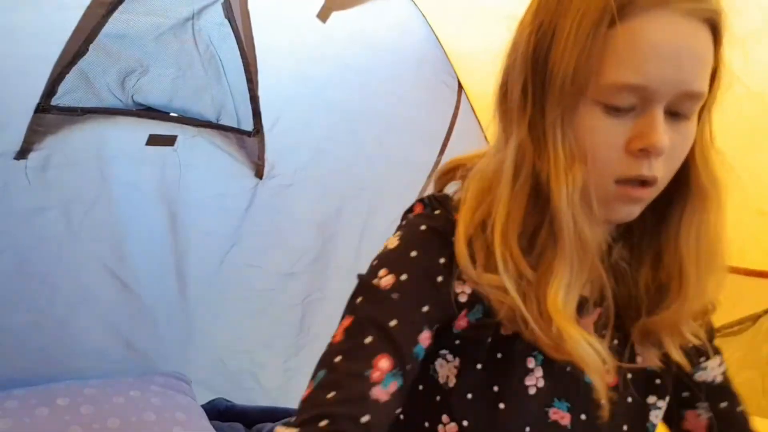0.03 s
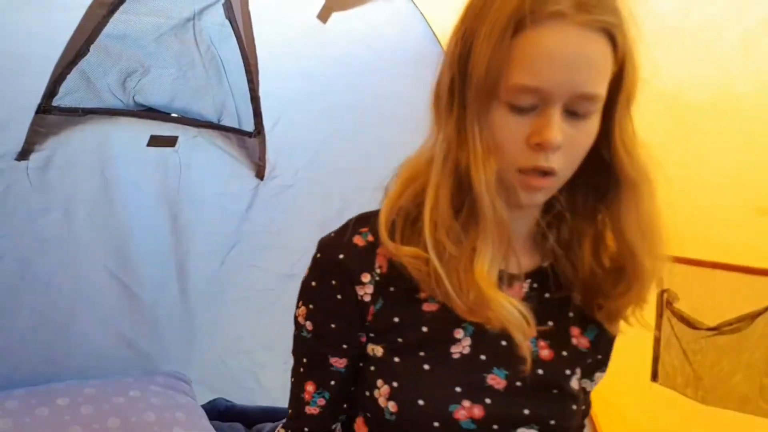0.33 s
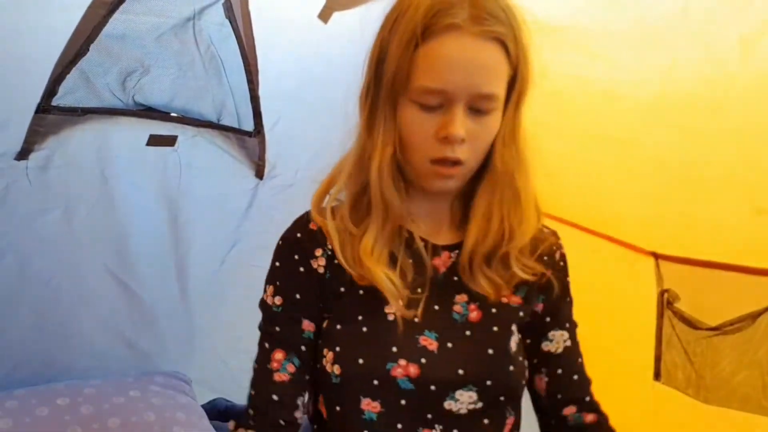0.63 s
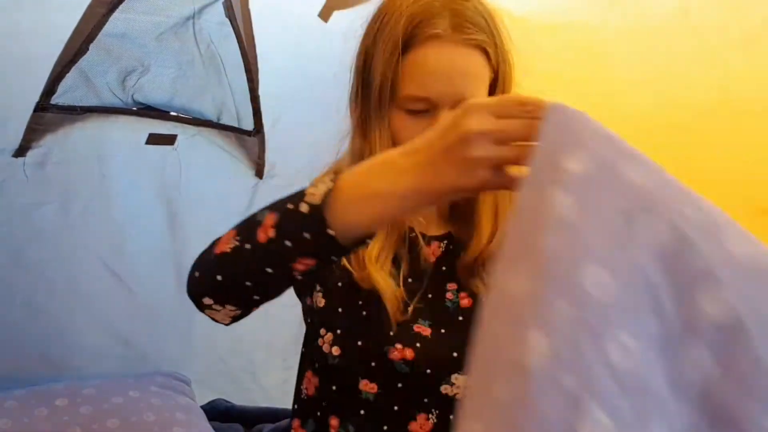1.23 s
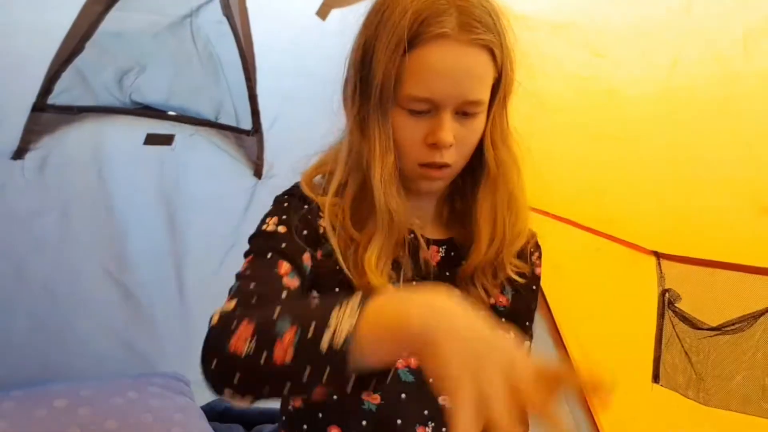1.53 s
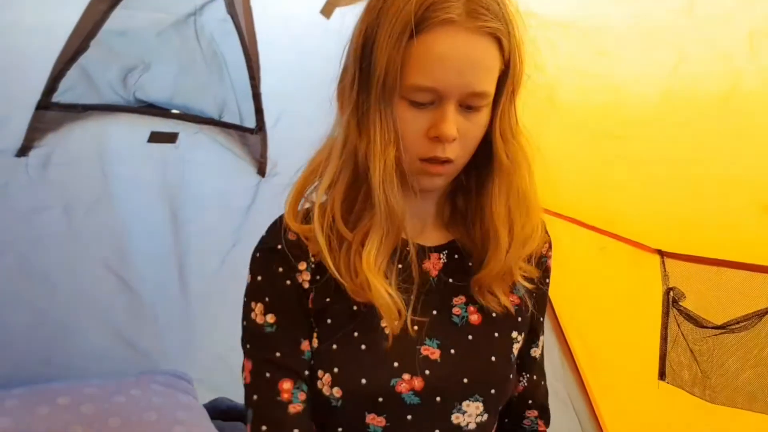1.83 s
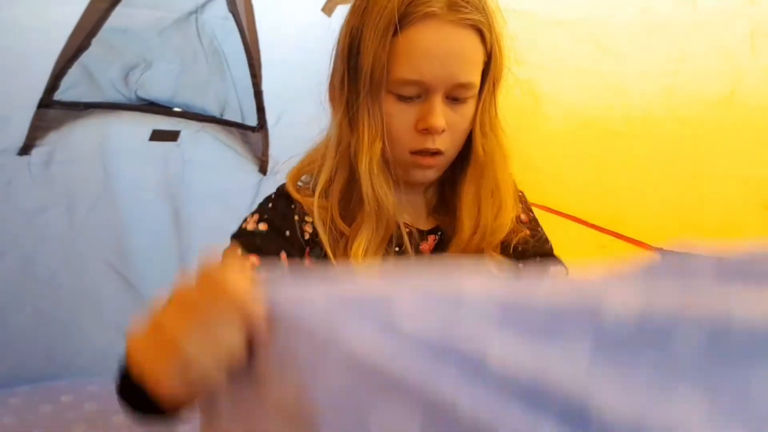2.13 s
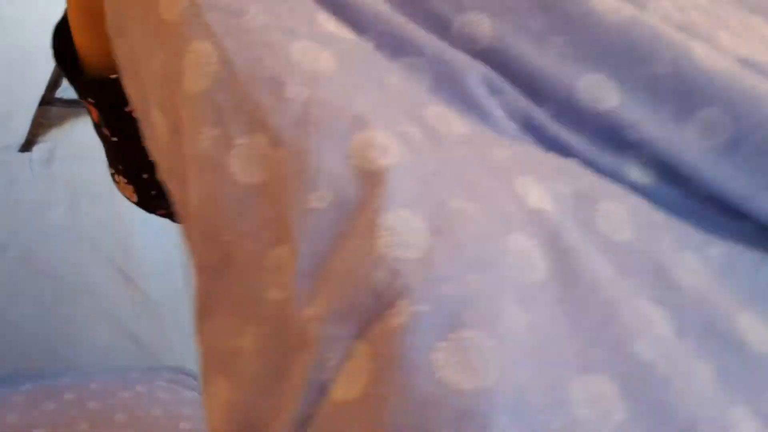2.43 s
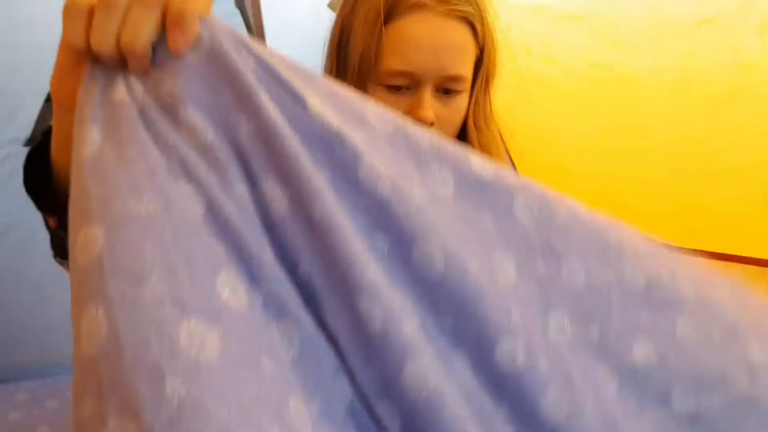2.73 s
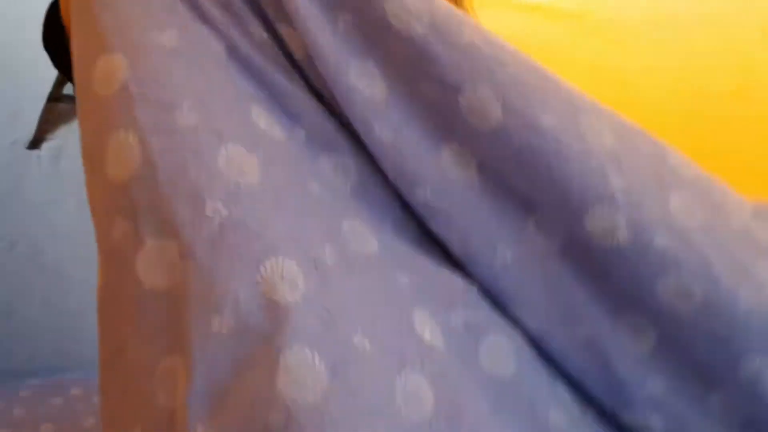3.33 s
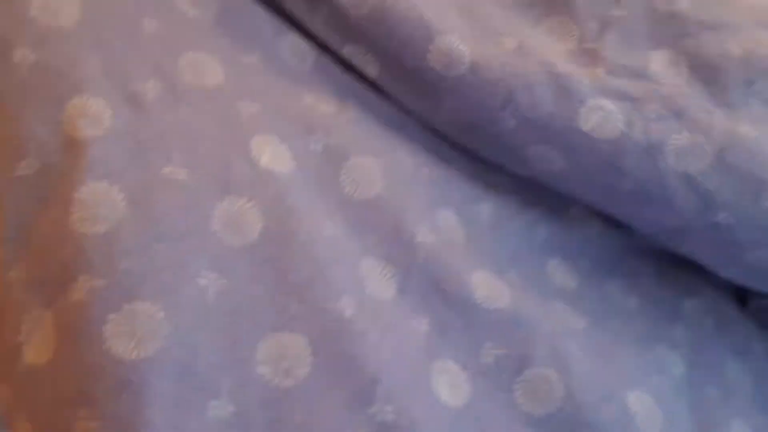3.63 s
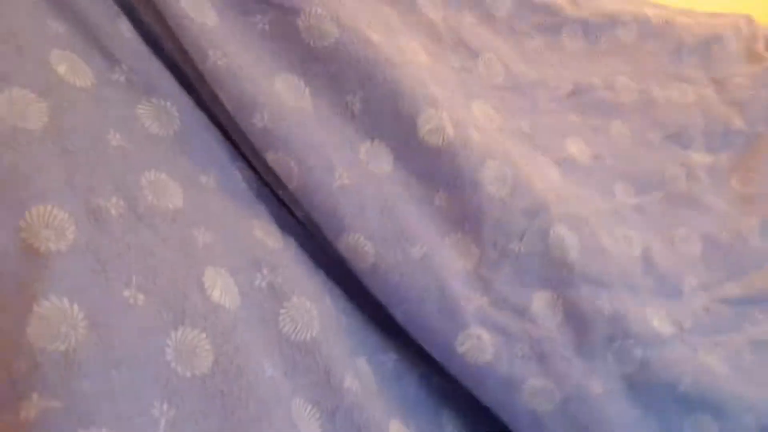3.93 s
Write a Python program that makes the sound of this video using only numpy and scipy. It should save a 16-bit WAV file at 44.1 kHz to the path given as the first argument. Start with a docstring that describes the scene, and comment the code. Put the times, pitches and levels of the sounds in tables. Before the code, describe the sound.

A cloth sheet swishes and flaps softly close by, over a low outside rumble.

```python
"""Shaking out a sheet in a tent

Inside a tent, close to the microphone, a cloth sheet is lifted, shaken and spread out twice.
The weave hisses as it slides and swishes when pulled; folds flap softly, small creases tick,
and the billowing cloth pushes puffs of air at the microphone.
A steady low rumble comes in from outside, and twice a faint thin whistle sounds."""
import sys
import numpy as np
from scipy import signal
from scipy.io import wavfile

SR = 44100
rng = np.random.default_rng(int(sys.argv[2]) if len(sys.argv) > 2 else 0)


def to_wav(s):
    """Save 16-bit WAV."""
    ch = np.atleast_2d(s).T  # columns
    pcm = np.round(np.clip(ch, -1, 1) * 32767)  # PCM
    wavfile.write(sys.argv[1], SR, pcm.astype(np.int16))


N = 176400
TIME = np.arange(N) / SR

# the rumble outside swells a little: (time [s], level [dB])
RUMBLE_LEVEL = [(0,-32.5),(.6,-37),(1.3,-35),(2,-35),(2.7,-33.5),(3.3,-35.5),(4,-34.5)]
# narrow drones in the rumble: (frequency [Hz], level [dB])
DRONES = [(71,-41),(99,-42.5),(137,-45.5),(202,-49.5),(350,-54.5)]
# faint whistles: (start [s], length [s], pitch [Hz], level [dB], scoop [share of the pitch])
WHISTLES = [(0.745,0.17,2305,-58.5,0.012),(2.41,0.385,1240,-49.3,.09)]
# air pushed at the microphone: (time [s], peak [dB], pitch [Hz], pan left [dB])
AIR_PUFFS = [(0.098,-20,93,-2),(0.83,-28,69.5,-5),(0.857,-24.5,70,-1),(0.884,-23.5,71.4,0),(1.835,-21.5,74.4,0),(2.225,-24,76,-1),(2.556,-16.5,68,-4),(2.616,-18.5,65.4,-8),(3.102,-24,76,-1.5)]
# creases that slip: (time [s], level [dB], decay [s])
CREASE_TICKS = [(.2195,-42,.001),(0.2385,-42,.0015),(0.649,-47,0.0018),(1.4298,-39,.0008),(1.464,-36.5,0.0011),(1.475,-37,0.0011),(1.5640,-36.5,0.0017),(1.567,-47,.001),(1.575,-39,.001),(1.578,-47,.002),(2.559,-46,0.011),(2.711,-42.5,.002),(2.82,-38,.001),(2.8312,-37.5,.0015),(2.849,-40,.001),(2.8595,-43,.001),(2.931,-38,.0007),(2.9558,-40.5,0.0015),(3.073,-43,0.0023),(3.076,-42,0.001),(3.099,-45,.002),(3.122,-46,0.0011)]
# folds that flap and go taut: (time [s], level [dB], half-length [s], pan left [dB], edge over body [dB])
FOLD_FLUTTERS = [(0.12,-35.5,0.098,2,-7.5),(0.167,-36.5,0.0088,1,-6),(0.778,-35,0.033,0.5,-14),(0.822,-32.5,0.027,3,-12),(0.951,-37,0.01,-5,-4),(2.084,-41,0.0078,6,-4),(2.115,-28.5,0.018,6.5,-16.5),(2.227,-34,0.03,3.5,-19),(2.303,-33,0.01,1,-6.5),(2.43,-31.5,0.046,0.5,-11),(2.545,-31,0.027,0,-28),(2.655,-39,0.12,7,-15),(2.87,-33,0.064,0.5,-22),(3.484,-35,0.03,1,-12)]
# soft slaps of the hem: (time [s], level [dB], half-length [s])
HEM_SLAPS = [(0.1739,-25,0.00048),(0.143,-30,.0014),(.782,-27,0.0011),(0.807,-29,0.00091),(0.817,-24,0.00062),(.954,-20.5,0.0011),(2.0792,-19.5,0.00044),(2.0925,-32,0.00088),(2.112,-11.5,0.00076),(2.1228,-27,.0013)]
# cloth sliding lightly on cloth: (time [s], level [dB])
SLIDE_LEVEL = [(0,-50.5),(.2,-55),(.3,-51),(.44,-49),(.61,-53),(.75,-50),(.98,-49.5),(1.07,-54),(1.14,-56.5),(1.21,-49),(1.29,-49.5),(1.41,-49.5),(1.58,-49.5),(1.61,-55),(1.65,-48),(1.75,-54),(1.88,-53.5),(2.02,-50.5),(2.25,-46),(2.36,-48.5),(2.5,-50),(2.76,-53.5),(2.84,-45.5),(3.0,-52.5),(3.1,-50),(3.2,-55),(3.31,-56),(3.41,-49),(3.68,-49),(3.8,-53),(3.92,-48),(4,-52.5)]
# cloth dragged under tension, a fuller rub: (time [s], level [dB])
DRAG_LEVEL = [(0,-47),(.08,-52.5),(.14,-41.5),(.23,-46),(.31,-54.5),(.69,-58),(.75,-49.5),(.98,-47),(1.06,-55.5),(1.33,-61),(1.85,-56.5),(2.05,-59),(2.2,-47),(2.53,-51.5),(2.77,-59.5),(2.89,-48),(3.01,-57.5),(3.31,-61),(3.48,-50),(4,-51.5)]
# quick pulls of the sheet: (peak time [s], level [dB], rise [s], fall [s])
SWISHES = [(0.133,-37.5,0.048,0.057),(.238,-48.5,0.024,.018),(.951,-49,0.019,0.019),(2.41,-39.5,0.017,0.11)]
# the hem brushing over cloth, thin and bright: (peak time [s], level [dB], rise [s], fall [s])
HEM_BRUSHES = [(.15,-43.5,0.038,0.028),(.953,-45.5,0.016,0.036),(1.22,-54.5,0.027,.03),(1.28,-49,0.022,0.026),(1.345,-48,0.022,0.032),(2.41,-43,0.026,.03)]

# spectrum of each noise at the microphone: (frequency [Hz], relative density [dB])
RUMBLE_COLOUR = [(38,-1),(55,0),(72,-5.5),(110,-7.5),(145,-9),(180,-12.5),(260,-16.5),(420,-20.5),(650,-22.5),(950,-24.5),(1400,-31.5),(2100,-42),(3200,-55),(15000,-72)]
TICK_COLOUR = [(1500,-6),(4000,-17),(8000,-1),(12000,-4.5),(15500,-32.5)]
FOLD_BODY_COLOUR = [(50,0.5),(120,4),(230,1),(400,-7),(700,-18.5),(1300,-32.5),(2500,-36)]
FOLD_EDGE_COLOUR = [(250,-3),(450,5),(750,-3.5),(1200,-9),(2200,-19)]
SLIDE_COLOUR = [(1500,-28),(3000,-10),(4500,-3.5),(6200,-3.5),(8000,-2.5),(10000,-1.5),(11800,-0.5),(14000,-5),(15500,-1)]
DRAG_COLOUR = [(200,6),(600,9),(1400,5),(2300,3),(3200,2.5),(4600,0.5),(7000,-2.5),(14000,-7)]
SWISH_COLOUR = [(300,13),(900,6.4),(1500,14),(2200,7.4),(4000,5.3),(6000,4.3),(8000,8.1),(12000,1.8),(15500,8.2)]
BRUSH_COLOUR = [(6000,-8),(9000,-11),(12000,-4.5),(15000,-6)]
# likeness of the left and right channels: (frequency [Hz], correlation [-1 to 1])
RUMBLE_LIKENESS = [(50,0.98),(130,0.94),(260,0.72),(500,0.75),(900,0.013),(1500,-0.16),(3000,-0.072),(12000,-0.88)]
CLOTH_LIKENESS = [(200,0.83),(500,0.87),(1100,-0.35),(2500,0.014),(5000,-0.057),(9000,0.016),(13000,0.17)]


def from_db(db):
    """Decibels to gain."""
    return 10 ** (np.asarray(db) / 20)


def rms_one(x):
    """Scale to unit rms."""
    return x / np.sqrt(np.mean(x ** 2) + 1e-20)


def gain_curve(levels):
    """A level curve as a gain at every sample."""
    return from_db(np.interp(TIME, *np.transpose(levels)))


def at_hz(points, hz):
    """Read a curve on a log-frequency axis."""
    frequencies, values = np.transpose(points)
    return np.interp(np.log(hz), np.log(frequencies), values)


def pan(db):
    """Left and right gains, the left louder by db."""
    return from_db(np.array([[db], [-db]]) / 2)


def drift(rate_hz):
    """A smooth random wander, rms 1."""
    step, settle = 40, 2000
    pole = np.exp(-2 * np.pi * rate_hz * step / SR)
    white = rng.standard_normal(N // step + settle + 2)
    slow = signal.lfilter([1], [1, -2 * pole, pole * pole], white)[settle:]
    return np.interp(np.arange(N) / step, np.arange(len(slow)), rms_one(slow))


def noise(colour, likeness, flicker_db, flicker_hz=16.4):
    """Stereo noise in third-octave bands, each with its own level, flicker and likeness; rms 1."""
    edges = np.geomspace(35, 17000, 27)
    white, out = rng.standard_normal((2, 2, N)), 0
    for k, (low, high) in enumerate(zip(edges, edges[1:])):
        if high < colour[0][0] / 2 or low > colour[-1][0] * 2:
            continue
        band = signal.butter(3, [low, high], "band", fs=SR, output="sos")
        mid, side = signal.sosfilt(band, white[k % 2])
        hz = np.sqrt(low * high)
        alike = np.clip(at_hz(likeness, hz), -1, 1)
        gain = from_db(at_hz(colour, hz) + flicker_db * drift(flicker_hz))
        out = out + gain * (np.sqrt(1 + alike) * mid + np.sqrt(1 - alike) * side * [[1], [-1]])
    return rms_one(out)


def swell(s, rise, fall):
    """A rounded rise to a peak at s, then an exponential fall."""
    return np.exp(-(np.minimum(TIME - s, 0) / rise) ** 2 - np.maximum(TIME - s, 0) / fall)


def bump(s, half_length):
    """A bell-shaped envelope centred on s."""
    return np.exp(-((TIME - s) / half_length) ** 2)


def narrow_tone(hz, width_hz):
    """A tone whose strength and phase wander within a narrow band."""
    phase = 2 * np.pi * np.cumsum(hz + np.zeros(N)) / SR
    return rms_one(drift(width_hz) * np.cos(phase) + drift(width_hz) * np.sin(phase))


def outside_rumble():
    """A steady low rumble with a few drones, heard from inside the tent."""
    rumble = gain_curve(RUMBLE_LEVEL) * pan(0.4) * noise(RUMBLE_COLOUR, RUMBLE_LIKENESS, flicker_db=1.48)
    drones = sum(from_db(db) * narrow_tone(hz, width_hz=7.4) for hz, db in DRONES)
    return rumble + drones


def whistles(scoop_s=0.0497, fade_s=0.03, width_hz=60, waver_hz=14, core_share=0.45):
    """Faint airy whistles scoop up to their pitch and hold it: a wavering core inside a narrow hiss."""
    out = 0
    for s, length, hz, db, scoop in WHISTLES:
        pitch = hz * (1 - scoop * np.exp(-np.maximum(TIME - s, 0) / scoop_s))
        held = np.clip(np.minimum(TIME - s, s + length - TIME) / fade_s + .5, 0, 1)
        wavering_hz = [pitch + waver_hz * drift(width_hz) for _ in range(2)]
        core = rms_one(np.sin(2 * np.pi * np.cumsum(wavering_hz, axis=1) / SR))
        air = np.array([narrow_tone(pitch, width_hz) for _ in range(2)])
        out = out + from_db(db) * held * (np.sqrt(core_share) * core + np.sqrt(1 - core_share) * air)
    return out


def air_puffs(half_length_cycles=0.71):
    """The billowing sheet sucks and pushes the air at the microphone for a cycle or two."""
    out = 0
    for s, db, hz, pan_db in AIR_PUFFS:
        pressure = -np.cos(2 * np.pi * hz * (TIME - s)) * bump(s, half_length_cycles / hz)
        out = out + from_db(db) * pan(pan_db) * pressure
    return out


def creases(rise_s=0.00023):
    """Each crease slips with a tiny bright scratch, left of centre."""
    slips = sum(from_db(db) * swell(s, rise_s, decay) for s, db, decay in CREASE_TICKS)
    return slips * pan(5) * noise(TICK_COLOUR, CLOTH_LIKENESS, flicker_db=3.2)


def hem_slaps():
    """The hem slaps close by, each time with one rounded dip in pressure."""
    dips = -sum(from_db(db) * bump(s, half_length) for s, db, half_length in HEM_SLAPS)
    return signal.sosfilt(signal.butter(1, 60, "high", fs=SR, output="sos"), dips)


def flapping_folds():
    """Folds flutter in dull bursts, with a papery edge when they go taut."""
    body = noise(FOLD_BODY_COLOUR, CLOTH_LIKENESS, flicker_db=1.7)
    edge = noise(FOLD_EDGE_COLOUR, CLOTH_LIKENESS, flicker_db=3.0)
    return sum(from_db(db) * pan(pan_db) * bump(s, half_length) * (body + from_db(edge_db) * edge)
               for s, db, half_length, pan_db, edge_db in FOLD_FLUTTERS)


def snags(per_s=390, power_share=0.17, spread_db=2.5, release_s=0.0008):
    """Threads catch and let go at random: a grainy gain on the friction hiss, rms 1."""
    sizes = from_db(spread_db * np.minimum(rng.exponential(1, N), 5))
    catches = sizes * (rng.random(N) < per_s / SR)
    power = signal.lfilter([1], [1, -np.exp(-1 / (release_s * SR))], catches ** 2 + 1e-18)
    return np.sqrt(1 - power_share + power_share * power / power.mean())


def weave_friction(flicker_db=1.6):
    """The weave rubs close to the microphone: slides, drags, swishes and brushes share one grain."""
    pulls = sum(from_db(db) * swell(s, rise, fall) for s, db, rise, fall in SWISHES)
    touches = sum(from_db(db) * swell(s, rise, fall) for s, db, rise, fall in HEM_BRUSHES)
    slide = gain_curve(SLIDE_LEVEL) * pan(0.5) * noise(SLIDE_COLOUR, CLOTH_LIKENESS, flicker_db)
    drag = gain_curve(DRAG_LEVEL) * pan(3) * noise(DRAG_COLOUR, CLOTH_LIKENESS, flicker_db)
    swish = pulls * pan(2) * noise(SWISH_COLOUR, CLOTH_LIKENESS, flicker_db)
    brush = touches * noise(BRUSH_COLOUR, CLOTH_LIKENESS, flicker_db)
    return snags() * (slide + drag + swish + brush)


def scene():
    """The sheet up close, with the faint whistles and the outside rumble behind it."""
    sheet = weave_friction() + creases() + flapping_folds() + hem_slaps() + air_puffs()
    return sheet + whistles() + outside_rumble()


def record(dry, low_cut_hz=26, high_cut_hz=15500):
    """The microphone chain rolls off the deepest bass and cuts the top steeply."""
    low_cut = signal.butter(2, low_cut_hz, "high", fs=SR, output="sos")
    high_cut = signal.ellip(12, .1, 80, high_cut_hz, fs=SR, output="sos")
    return signal.sosfilt(high_cut, signal.sosfilt(low_cut, dry))


dry = scene()
out = record(dry)
to_wav(out)
```